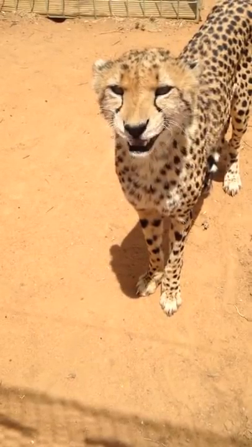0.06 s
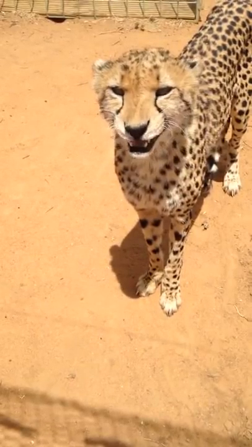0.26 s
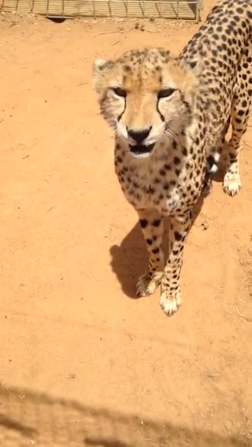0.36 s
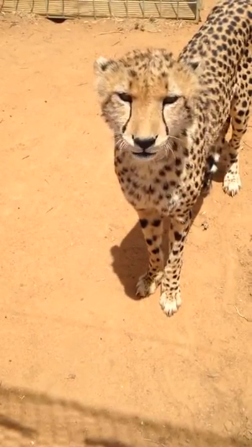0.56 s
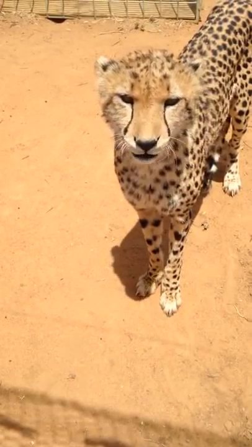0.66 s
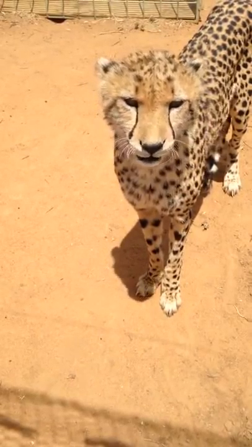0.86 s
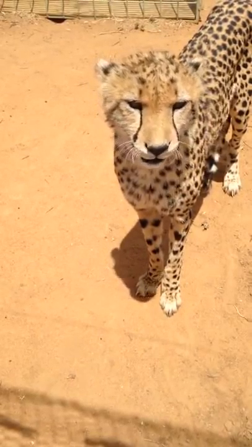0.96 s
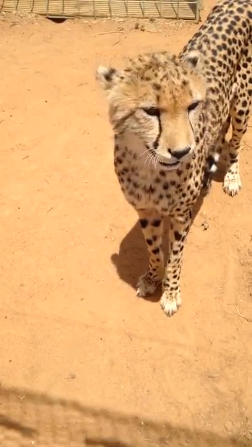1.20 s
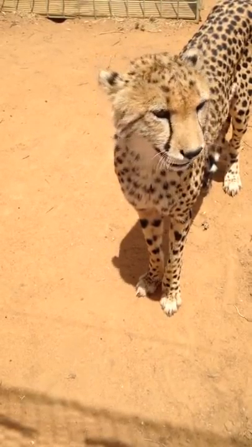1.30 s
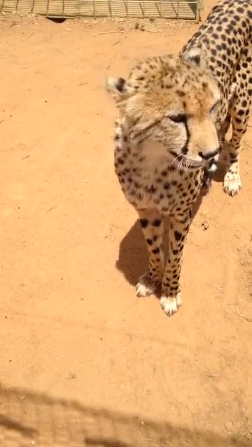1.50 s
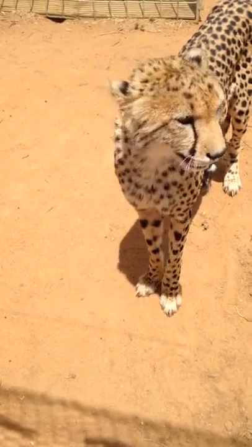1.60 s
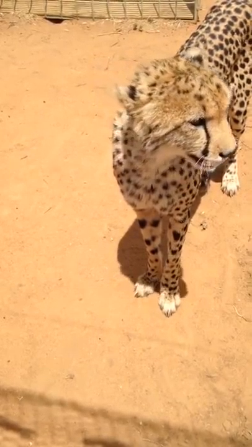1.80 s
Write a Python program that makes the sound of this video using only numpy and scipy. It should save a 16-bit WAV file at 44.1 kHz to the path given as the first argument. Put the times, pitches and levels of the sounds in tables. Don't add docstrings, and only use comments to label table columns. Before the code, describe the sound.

One brief, nearly pure cheetah meow rises, turns slightly rough and drops off, followed by soft breath and two wet lip ticks, in a dry open yard with quiet insect buzz and bird whistles, heard through a phone.

```python
import sys
import numpy as np
from scipy import signal
from scipy.io import wavfile
from scipy.ndimage import uniform_filter1d

SR = 44100
rng = np.random.default_rng(int(sys.argv[2]) if len(sys.argv) > 2 else 0)


def to_wav(sig):
    pcm = np.clip(np.atleast_2d(sig), -1, 1) * 32767
    pcm = np.round(pcm).astype(np.int16)
    wavfile.write(sys.argv[1], SR, pcm.T)


def how_loud(loudness_db):
    steps = np.asarray(loudness_db, float) / 20
    return 10 ** steps


N = 81585


def level(x, db):
    return x * how_loud(db) / np.sqrt(np.mean(x ** 2))


def band(x, hz, width):
    return signal.lfilter(*signal.iirpeak(hz, hz / width, fs=SR), x)


def steep(x, hz, width):
    return band(band(x, hz, width), hz, width)


def noise():
    return rng.standard_normal(N)


def walk(rate):
    k = int(SR / rate)
    w = np.repeat(rng.standard_normal(N // k + 1), k)
    w = uniform_filter1d(uniform_filter1d(w, k), k)[:N]
    return (w - w.mean()) / w.std()


def swell(t, start, length, rise=.25):
    u = np.clip((t - start) / length, 0, 1)
    slope = np.minimum(u / rise, (1 - u) / (1 - rise))
    return np.sin(np.pi / 2 * np.clip(slope, 0, 1)) ** 2


def ring(t, start, hz, t60):
    u = np.maximum(t - start, 0)
    return np.sin(2 * np.pi * hz * u) * how_loud(-60 * u / t60)


def echo(x, t60, db):
    n = int(t60 * SR)
    tail = rng.standard_normal(N)[:n] * how_loud(-60 * np.arange(n) / n)
    tail = tail / np.sqrt(np.sum(tail ** 2))
    return x + how_loud(db) * signal.fftconvolve(x, tail)[:N]


# (frequency [Hz], density [dB per Hz])
AIR_SPECTRUM = [(15, -39), (25, -5), (133, 0), (664, -12.5), (874, -5), (1070, -15.5), (1910, -15),
                (6000, -20), (7800, -50), (13200, -120)]


def air():
    gust, buffet = walk(0.94), walk(25)
    f, density_db = np.array(AIR_SPECTRUM).T
    rustle = 0
    for hz in 45 * 2 ** np.arange(0, 7.5, .5):
        db = np.interp(np.log(hz), np.log(f), density_db) + .4 * gust + 1.5 * walk(16)
        db = db + (hz < 300) * 2.5 * buffet
        rustle = rustle + how_loud(db) * steep(noise(), hz, hz / 1.66)
    hiss = np.diff(rng.standard_normal(N + 1)) * 0.083 + noise()
    return level(rustle, -69.5) + level(hiss, -77.5)


# (time [s], click rate [Hz], level [dB])
CICADA_COURSE = [(0.0, 699.5, -62), (0.05, 679.7, -59), (0.17, 685.5, -60), (0.252, 693.3, -61.5),
                 (0.478, 681.5, -62), (0.541, 689, -64.5), (0.808, 687, -61.5), (0.922, 686.7, -62.5),
                 (0.948, 700.4, -62), (1.06, 679.5, -61), (1.21, 679, -61), (1.338, 701, -63),
                 (1.484, 692, -62), (1.586, 685.6, -64), (1.844, 684, -64), (1.85, 681, -63)]
# (multiple of click rate [ratio], level [dB])
TYMBAL_LINES = [(10, -19), (11, -3.5), (12, 0), (13, -10), (14, -19)]


def cicada(t):
    throb_hz, throb_db = 57.9, 10
    slip, quickening = .008, .033
    s, hz, db = np.array(CICADA_COURSE).T
    hz = np.interp(t, s, hz)
    beat = throb_hz * t + .35
    since = beat % 1
    offset = slip * noise()[beat.astype(int)]
    clicks = hz * since * (1 + quickening / 2 * (since - 1)) / throb_hz
    phase = 2 * np.pi * (clicks + offset)

    dips = np.cos(np.pi * since) ** 6 + .4 * np.exp(-((since - .45) / .08) ** 2)
    gate = how_loud(-throb_db * dips + walk(300))
    free_phase = 2 * np.pi * np.cumsum(hz) / SR
    near, far = 0, 0
    for k, line_db in TYMBAL_LINES:
        near = near + how_loud(line_db + 0.52 * walk(200) + .8 * walk(30)) * np.cos(k * phase)
        far = far + how_loud(line_db) * walk(600) * np.cos(k * free_phase)
    near = echo(gate * near, .03, -10)
    blur = level(steep(gate * noise(), 7870, 1700), -12)
    chorus = level(near, 0) + level(far, -8) + blur
    return level(chorus, 0) * how_loud(np.interp(t, s, db))


# (time [s], length [s], start pitch [Hz], end pitch [Hz], level [dB])
BIRD_NOTES = [(1.363, .092, 7000, 3560, -59), (1.346, .011, 4200, 5400, -73),
              (1.506, .018, 5800, 2750, -70), (1.518, .014, 2750, 2650, -71), (1.532, .02, 2750, 2550, -73),
              (1.508, .009, 4600, 4000, -68), (1.53, .035, 2700, 1450, -77), (.845, .03, 1800, 2100, -75),
              (.868, .04, 2100, 1700, -75), (.9, .125, 1680, 1720, -73), (.94, .07, 3480, 3380, -79),
              (.978, .022, 4200, 3700, -73), (.984, .022, 3500, 3100, -75), (1.0, .05, 2900, 2250, -77),
              (1.09, .04, 2650, 2200, -76), (1.175, .05, 1400, 2850, -73), (1.195, .02, 3000, 2900, -71),
              (1.205, .03, 2900, 2250, -74), (1.24, .03, 3100, 2750, -73), (1.243, .016, 3800, 2900, -77),
              (1.262, .04, 2300, 2800, -77), (1.16, .035, 2300, 3600, -77), (.775, .022, 4200, 2600, -75),
              (.8, .025, 3000, 2800, -76), (.02, .016, 4900, 5100, -78), (.09, .02, 5200, 3700, -76),
              (.815, .04, 4500, 4700, -81), (1.55, .04, 2300, 3100, -79)]


def birds(t):
    out = 0
    for s, length, from_hz, to_hz, db in BIRD_NOTES:
        share = .21 if from_hz > 5500 else .9
        end = np.exp(-1 / share)
        left = (np.exp(-np.clip((t - s) / length, 0, 1) / share) - end) / (1 - end)
        hz = (to_hz + (from_hz - to_hz) * left) * (1 + .011 * walk(120))
        whistle = np.sin(2 * np.pi * np.cumsum(hz) / SR)
        out = out + how_loud(db + 1.8 * walk(150)) * swell(t, s, length, .3) ** .55 * whistle
    return echo(out * np.sqrt(2), .12, -3)


# (time [s], peak level [dB], ring frequency [Hz])
LIP_POPS = [
    (.0458, -45, 1550),
    (.0498, -50, 1600),
    (.0553, -55, 2200),
    (.0575, -54, 2300),
    (.0633, -52, 1400),
    (.0674, -52, 2900),
    (1.8035, -50, 2200),
    (1.8118, -54, 2700),
]


def creak(t):
    t60 = 0.0085
    out = 0
    for s, db, hz in LIP_POPS:
        out = out + how_loud(db) * (ring(t, s, hz, t60) + 0.47 * ring(t, s, 1.7 * hz, .4 * t60))
    return out


# (time [s], length [s], level [dB], centre frequency [Hz], bandwidth [Hz])
BREATH_PUFFS = [(.65, .018, -63, 2600, 2200), (.655, .028, -60, 420, 200), (.706, .042, -58.5, 850, 1200),
                (.705, .09, -67.5, 260, 400), (.735, .065, -65, 1100, 1200), (.626, .008, -60, 4800, 1400),
                (.655, .09, -73, 4550, 300), (.705, .05, -67, 2400, 1800), (.665, .05, -70, 1200, 2500),
                (.3, .4, -73, 450, 500), (.21, .11, -76, 2400, 1500), (1.803, .045, -57, 90, 110),
                (.05, .025, -66, 2200, 2500), (1.807, .05, -65, 1500, 2000), (1.59, .1, -73, 420, 300),
                (1.775, .035, -72, 2200, 2000)]


def puffs(t):
    out = 0
    for s, length, db, hz, width in BREATH_PUFFS:
        grainy = noise() * how_loud(2.2 * walk(300))
        out = out + swell(t, s, length, .2) ** 0.45 * level(steep(grainy, hz, width), db)
    return out


# (time [s], pitch [Hz], level [dB], lopsidedness of the swing [0-1])
MEOW_ARCH = [
    (.199, 864, -37.5, .2),
    (.245, 905, -33.8, 0),
    (.3, 925, -32, .03),
    (.385, 954, -26.9, .1),
    (.505, 908, -31.6, .62),
    (.545, 903, -31, .85),
    (.608, 840, -37, .95),
    (.646, 780, -35.2, .5),
    (.659, 672, -41.5, .5),
]


def meow(t):
    grow_db_per_s, die_db_per_s = 3005.5, 3600
    s, *curves = np.array(MEOW_ARCH).T
    hz, db, lopsided = (uniform_filter1d(np.interp(t, s, c), size=250) for c in curves)
    before, after = np.maximum(s[0] - t, 0), np.maximum(t - s[-1], 0)
    edge = how_loud(-grow_db_per_s * before - die_db_per_s * after)
    phase = 2 * np.pi * np.cumsum(hz * (1 + .001 * walk(60))) / SR
    tone = how_loud(db) * (1 + how_loud(-41) * walk(150)) * np.sin(phase)
    voice = tone + overtones(phase, hz, db, lopsided) + subharmonics(t, phase)
    return np.sqrt(2) * voice * edge + rasp(t)


# (multiple of pitch [ratio], level [dB], level followed [dB/dB], gain when lopsided [dB])
OVERTONE_LINES = [(2, -75, 1.6, 16), (3, -60, .2, -8), (4, -88, .2, 27), (5, -90, .8, 0), (6, -93, .2, 22),
                  (7, -92, .56, 4.5)]
# (frequency [Hz], width [Hz], gain [dB])
THROAT_RESONANCES = [(1370, 110, 15), (1705, 75, 14), (2150, 150, 4), (2720, 150, 3), (3230, 190, 10),
                     (3420, 50, -9), (3540, 120, 3), (3950, 110, 13), (4270, 70, 13), (4720, 150, 8),
                     (5030, 70, -22), (5280, 220, 10), (5680, 130, -10), (6650, 80, 8)]


def overtones(phase, hz, db, lopsided):
    out = 0
    for k, base_db, follow, lopsided_db in OVERTONE_LINES:
        throat_db = sum(d * np.exp(-((k * hz - f) / w) ** 2) for f, w, d in THROAT_RESONANCES)
        line_db = base_db + throat_db + follow * (db + 34.5) + lopsided_db * lopsided
        out = out + how_loud(line_db + 1.5 * walk(50)) * np.cos(k * phase + 0.13 * k * walk(46))
    return out


def rasp(t):
    return level(steep(noise(), 1400, 1500), -63.5) * swell(t, .41, .21, 0.2) ** .5


# (multiple of pitch [ratio], level [dB])
THIRDS_LINES = [(2 / 3, -15), (4 / 3, 0), (5 / 3, -8), (7 / 3, -11), (8 / 3, -15), (10 / 3, -20),
                (11 / 3, -20)]


def subharmonics(t, phase):
    thirds_gate = swell(t, .415, .115, .3) ** 0.81
    halves_gate = swell(t, .5, .11, .3) ** 0.81
    out = 0
    for k, db in THIRDS_LINES:
        out = out + thirds_gate * how_loud(-59 + db + walk(40)) * np.sin(k * phase + 0.84 * walk(56))
    for k in (1.5, 2.5, 3.5):
        line = np.sin(k * phase + 0.4 * walk(70)) / (k - .5) ** 2.3
        out = out + halves_gate * how_loud(-65 + 2.8 * walk(51)) * line
    return out


# (time [s], peak level [dB], cheek frequency [Hz], length [s], tick level [dB])
LIP_SMACKS = [
    (1.6961, -35, 700, .0034, -41),
    (1.8048, -28, 710, .0026, -36),
]


def smacks(t):
    out = 0
    for s, db, hz, length, tick_db in LIP_SMACKS:
        tick = ring(t, s, 6600, 0.00144) + 1.02 * ring(t, s, 4200, 0.00163)
        tick = tick + 0.89 * ring(t, s, 2500, 0.0029) + 0.33 * ring(t, s, 12000, 0.00075)
        cheek = swell(t, s - .0002, length, .0013 / length) ** .9 * np.sin(2 * np.pi * hz * (t - s))
        cavity = ring(t, s + 0.0019, 0.48 * hz, 0.018) + ring(t, s + 0.00602, hz, 0.013)
        out = out + how_loud(tick_db) * tick - how_loud(db) * cheek + how_loud(db - 16) * cavity
    return out


def scene():
    t = np.arange(N) / SR
    cat = creak(t) + puffs(t) + meow(t) + smacks(t)
    return (air() + cicada(t) + birds(t) + echo(cat, .1, -32))[None]


def band_limit(x):
    return signal.sosfilt(signal.butter(12, 15280, fs=SR, output="sos"), x)


def record(dry):
    low_pass = signal.ellip(8, .2, 70, 15150, fs=SR, output="sos")
    mix = signal.sosfilt(low_pass, dry)
    return band_limit(mix)


dry = scene()
out = record(dry)
to_wav(out)
```